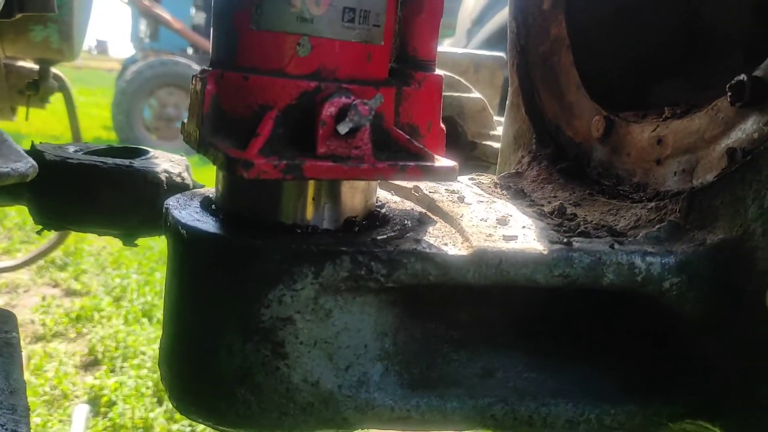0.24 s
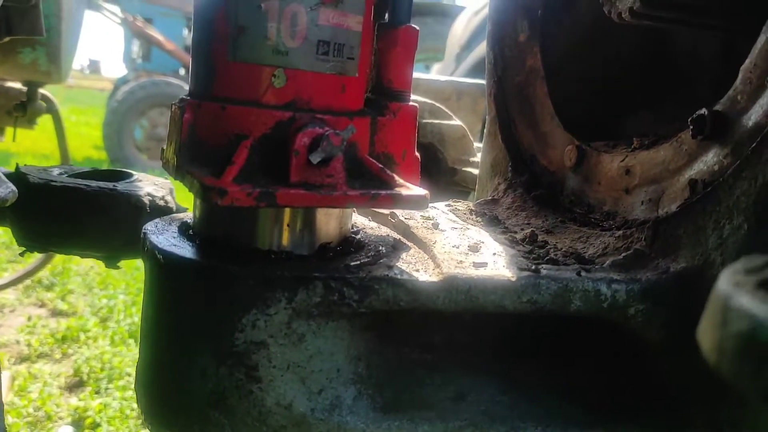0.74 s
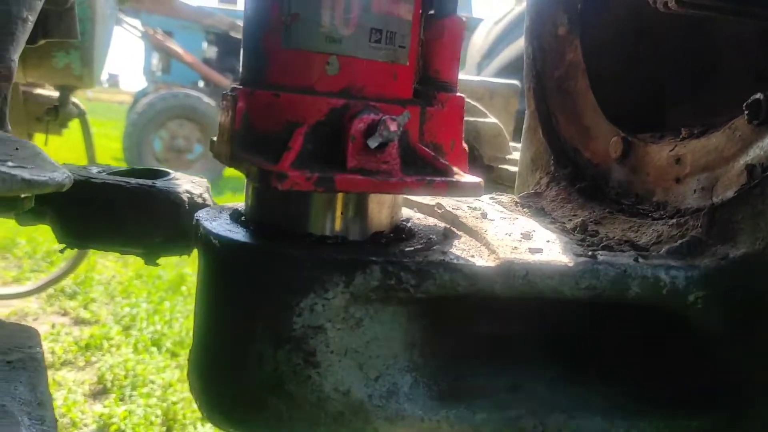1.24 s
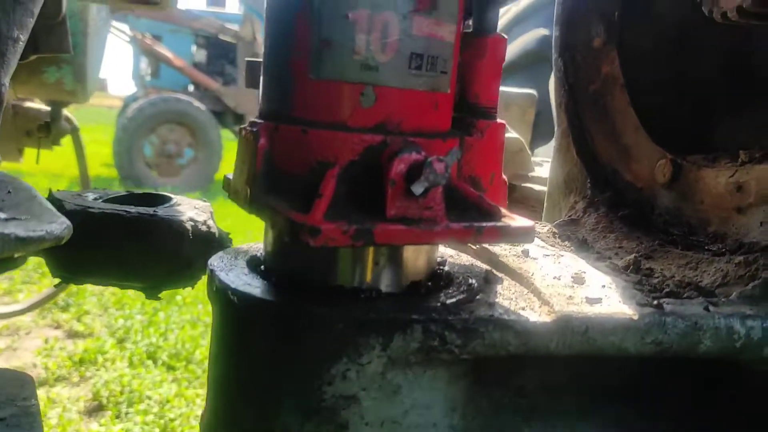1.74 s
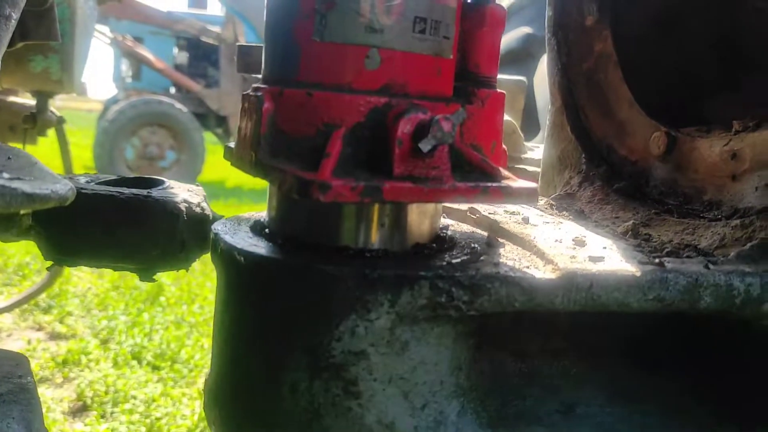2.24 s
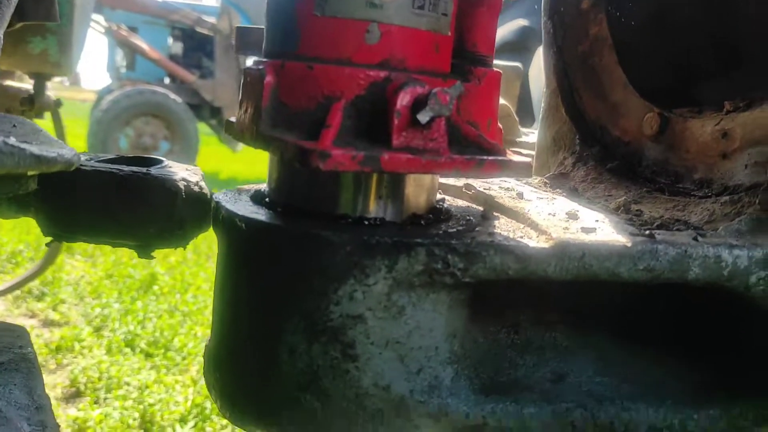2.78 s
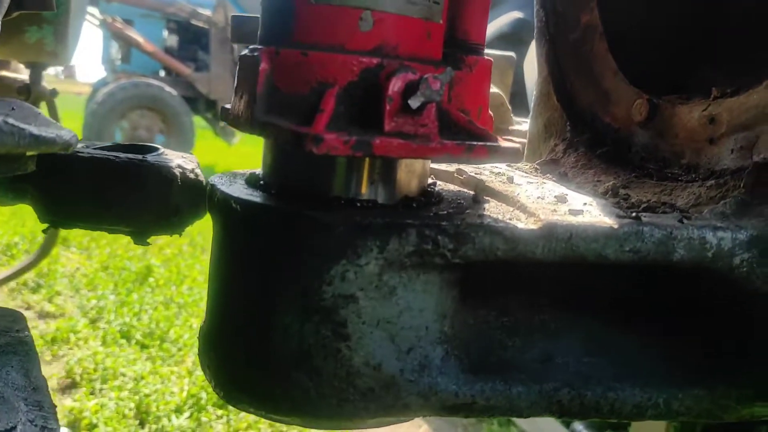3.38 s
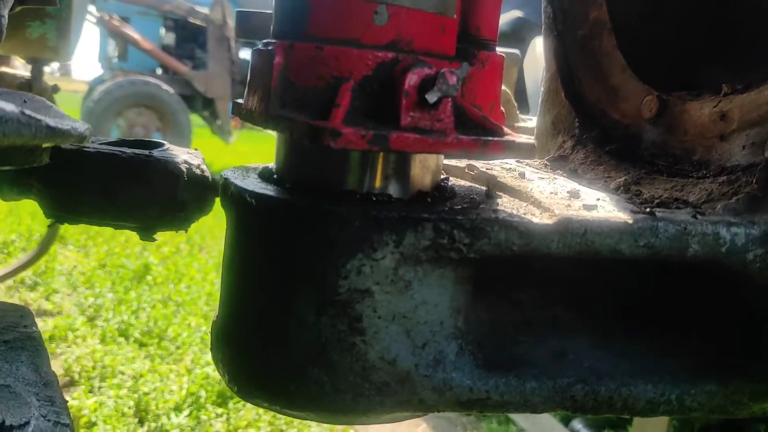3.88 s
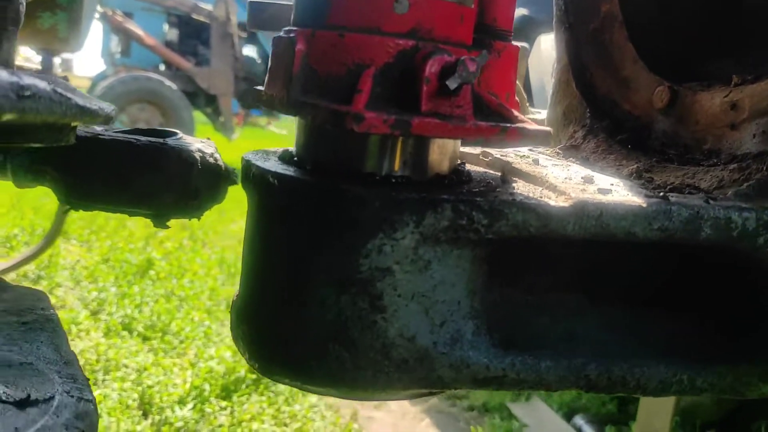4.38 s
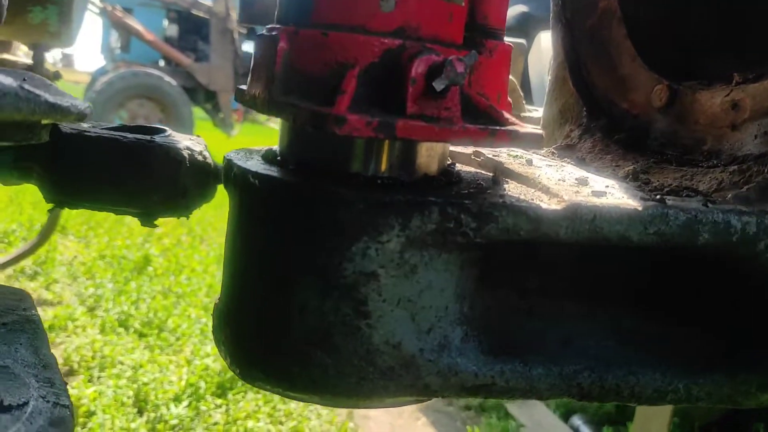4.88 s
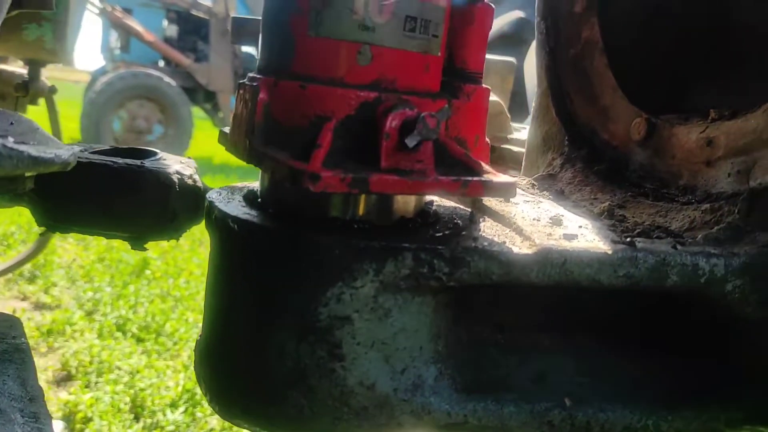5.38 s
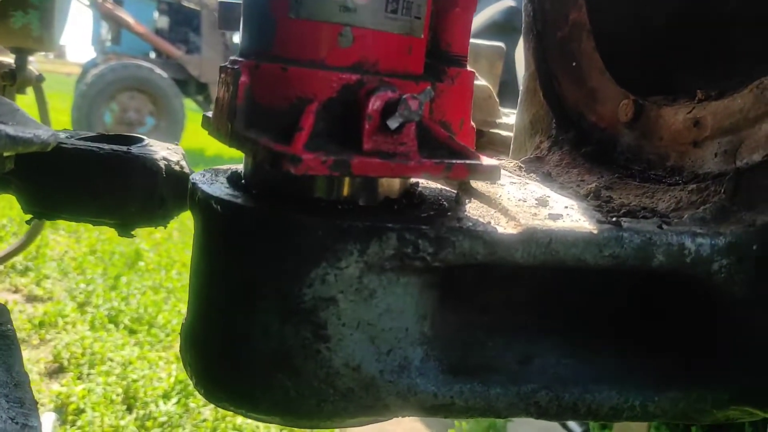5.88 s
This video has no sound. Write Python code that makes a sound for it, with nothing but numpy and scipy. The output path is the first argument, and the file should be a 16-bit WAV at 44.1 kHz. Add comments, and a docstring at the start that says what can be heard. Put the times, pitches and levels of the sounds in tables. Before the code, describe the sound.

Nine heavy metallic pump strokes clunk in triplets, a loose handle clicking and rasping between them, while a struck steel bar rings out twice over quiet open air.

```python
"""Knocks in threes through a heavy steel frame, with clicks, rasps and two ringing blows, over an outdoor hush.
A bottle jack is pumped by hand: each knock is a noise thud and crack, low frame modes and short bright rings.
The loose handle clicks (resonated noise bursts) and rasps into its socket (noise with a falling band).
A struck steel bar rings in damped modes; gain control ducks lasting loudness.
Shaped noise makes the hush, a low rumble and swells of wind and handling."""
import sys
import numpy as np
from scipy import signal
from scipy.fft import rfft, irfft
from scipy.io import wavfile
from scipy.ndimage import uniform_filter1d

SR = 44100
rng = np.random.default_rng(int(sys.argv[2]) if len(sys.argv) > 2 else 0)


def dump_mix(stems):
    """Bounce the given channels to the path in sys.argv[1] as a 16-bit WAV at rate SR."""
    frames = np.atleast_2d(stems).T  # one column per channel
    limited = np.clip(frames, -1, 1)  # hard clip at full scale
    pcm = np.round(limited * 32767).astype(np.int16)
    wavfile.write(sys.argv[1], SR, pcm)


N = 269892
PORT_LAG_S = 0.0001  # the left port hears the jack later
BENDING_ROOT_S = .27  # in steel the low bending waves arrive later than the high ones

# pump strokes, three knocks each: t/s, first knock level/dB, later knocks level/dB,
# gap to second/s, gap from second to third/s
STROKES = [(0.1331, -17.5, -24, 0.068, .0382), (0.9028, -19, -25.5, .1208, 0.047),
           (1.7942, -18.5, -25, 0.13, 0.048), (2.615, -17, -22.5, 0.083, 0.056),
           (3.2876, -22, -22.5, 0.058, .0438), (3.9366, -18, -19.5, 0.061, 0.037),
           (4.556, -19.5, -20, .0448, .0367), (5.123, -16.5, -20.5, 0.062, 0.04),
           (5.7024, -15, -20, 0.065, 0.05)]
# handle seating in its socket, a click then a rasp: t/s, click level/dB, rasp level/dB
SEATS = [(0.7506, -17, -29), (1.5996, -14, -27), (2.4624, -30, -30), (3.2153, -20.5, -27),
         (3.8885, -19, -26.5), (4.4966, -18.5, -26), (5.0835, -11.5, -27), (5.6564, -19.5, -26.5)]
# relative spectrum of a hard steel contact: f/Hz, level/dB, left-right/dB
CRACK_COLOUR = [(300, -5, 1), (750, 1, -12.5), (1550, -7.5, 3), (2430, -3.5, -9), (3020, -10, 19),
                (3080, -1, -20.5), (3580, -6.5, 11.5), (4120, -10, -4), (5370, -5, -9.5), (6360, -10, -18),
                (7420, -9, -20.5), (8640, -11.5, 12), (9500, -18, -1.5), (11450, -64.5, -13.5),
                (15700, -94, -26)]


def amp(db):
    """Amplitude ratio of a level in dB."""
    return 10 ** (np.asarray(db) / 20)


def unit(x):
    """Scale to unit RMS."""
    return x / np.sqrt(np.mean(x ** 2) + 1e-20)


def read(points, hz, axis=1):
    """One column of a spectrum, joined on a log-frequency axis."""
    points = np.array(points)
    return np.interp(np.log(hz + 1), np.log(points[:, 0] + 1), points[:, axis])


def add(mix, start_s, sound):
    """Mix a two-port sound in at start_s, cut at the end of the mix."""
    start = max(round(start_s * SR), 0)
    part = mix[:, start:][:, :sound.shape[1]]
    part += sound[:, :part.shape[1]]


def noise(size, likeness):
    """White noise at two ports, partly shared."""
    shared = np.clip(likeness, 0, 1)
    common = np.sqrt(shared) * rng.standard_normal(size)
    return common + np.sqrt(1 - shared) * rng.standard_normal((2, size))


def shaped_noise(table, likeness):
    """Unit-RMS noise with a tabled spectrum."""
    hz = np.fft.rfftfreq(N, 1 / SR)
    return unit(irfft(rfft(noise(N, likeness)) * amp(read(table, hz)), N))


def colour(x, table, size=2048):
    """Causal unit-power filter from the jack to each port; the left port hears it later."""
    hz = abs(np.fft.fftfreq(size, 1 / SR))
    pan_db = np.outer([.5, -.5], read(table, hz, axis=2))
    gain = unit(amp(read(table, hz) + pan_db))
    # minimum phase from the log gain
    taps = np.fft.ifft(np.exp(np.conj(signal.hilbert(np.log(gain))))).real
    late = np.exp(-2j * np.pi * np.outer([PORT_LAG_S, 0], np.fft.rfftfreq(size, 1 / SR)))
    lagged_taps = irfft(rfft(taps) * late)[:, :size // 2]
    return signal.oaconvolve(x, lagged_taps, axes=1)[:, :N]


def burst(rise_s, t60_s, tail_db, tail_t60_s, likeness):
    """Noise for a contact's dense modes: quick rise, fast fall, faint diffuse tail off the machine."""
    t = np.arange(SR // 3) / SR
    direct = amp(-60 * t / t60_s) * noise(len(t), likeness)
    tail = amp(tail_db - 60 * t / tail_t60_s) * noise(len(t), likeness / 2)
    return (1 - np.exp(-(t / rise_s) ** 2)) * (direct + tail)


def ring(modes, rise_s, lag_s, scatter_db, length=1, bending_root_s=0):
    """Damped modes, one row each, with scattered levels; bending sets phase by root frequency."""
    t = np.maximum(np.arange(SR * 3 // 2) / SR - np.array([[lag_s], [0]]), 0)
    rows = []
    for hz, db, t60_s, pan_db in modes:
        port_db = db + pan_db * np.array([[.5], [-.5]])
        level = amp(port_db + scatter_db * rng.standard_normal())
        decay = np.exp(-np.log(1000) * t / (t60_s * length))
        rows.append(level * decay * np.sin(2 * np.pi * (hz * t - bending_root_s * np.sqrt(hz))))
    return np.array(rows) * (1 - np.exp(-t / rise_s))


def swell_level():
    """A few Gaussian swells of wind and handling, made uneven by random lumps."""
    # t/s, level before lumps/dB, half length/s
    swells = [(.3, -44, .12), (1.3, -52, 0.31), (2.1, -50, 0.043), (2.797, -51, 0.18), (4.24, -41.5, 0.2),
              (5.155, -54, 0.12), (5.84, -42, 0.26)]
    lumps_per_s, lump_db = 26, 5
    t = np.arange(N) / SR
    lumps = np.interp(t * lumps_per_s, np.arange(1000), rng.standard_normal(size=1000))
    envelope = sum(amp(db) * np.exp(-((t - s) / half_s) ** 2) for s, db, half_s in swells)
    return amp(lump_db * lumps) * envelope


def air():
    """Shaped noise: steady outdoor hush with a high hiss, steady rumble, and lumpy low swells."""
    # relative spectra: f/Hz, level per Hz/dB
    hush_colour = [(25, -4.5), (250, -2), (400, -7.5), (650, -13.5), (950, -10.5), (1300, -18.5),
                   (2000, -21), (2850, -20.5), (3100, -18), (3400, -22), (4200, -22), (7100, -11),
                   (9100, -19.5), (9700, -39), (15000, -46), (16500, -67.5)]
    rumble_colour = [(10, -8), (28, 4.5), (75, -8.5), (200, -9.5), (600, -27.5), (3000, -81)]
    swell_colour = [(10, -13), (30, -1), (70, 0), (110, -12.5), (200, -1), (300, -8), (600, -26.5),
                    (3000, -79)]
    hush_db, rumble_db = -48, -55
    hush = shaped_noise(hush_colour, likeness=0.22)
    rumble = shaped_noise(rumble_colour, likeness=0.15)
    swell = shaped_noise(swell_colour, likeness=0.27)
    return amp(hush_db) * hush + amp(rumble_db) * rumble + swell_level() * swell


def knock_rows():
    """Every knock as t/s, level/dB; a stroke that hangs slips softly before its second knock."""
    slow_gap_s, slip_lead_s, slip_db = .1, .04, -6
    for s, first_db, later_db, gap_s, next_gap_s in STROKES:
        yield s, first_db
        if gap_s > slow_gap_s:
            yield s + gap_s - slip_lead_s, later_db + slip_db
        yield s + gap_s, later_db
        yield s + gap_s + next_gap_s, later_db


def knocks():
    """Each knock cracks with short bright rings and rings the frame afresh, choking its old ring."""
    # low modes of the frame: f/Hz, level/dB, t60/s, left-right/dB
    frame_modes = [(142.3, -18.5, 0.62, 11), (183.3, -16, 0.79, 7.5), (226.5, -13, 0.5, 6),
                   (251, -14, 0.46, 6), (306.3, 4, 0.2, 8.5), (343, -13.5, 0.064, 16.5),
                   (480, -3, 0.089, 20), (497, -23, 0.16, 2), (538, -3, 0.19, -6.5),
                   (555.5, -15.5, 0.32, 12.5), (609.5, -0.5, 0.13, 0), (636, -26, 0.045, -6),
                   (697, -4.5, .14, 15), (695, -22, 0.064, 0), (759, -15, 0.28, -11.5),
                   (794, -8, 0.25, -4.5), (806, -17.5, 0.14, 21), (962, -16, 0.27, 16.5),
                   (1010, -25, 0.77, -14), (1082, -7.5, 0.75, 6.5), (1257, -26.5, 0.27, 22),
                   (1340, -20, 0.23, 8.5), (1550, -13, 0.1, 4.5)]
    # short bright rings of the crack, some from the microphone: f/Hz, level/dB, t60/s, left-right/dB
    crack_modes = [(1598, -14, 0.074, -3.5), (2005, -30, 0.12, 15.5), (2374, -8.5, 0.027, 3),
                   (2510, -15, 0.077, 5.5), (2790, -17.5, 0.082, -1), (3076, -9.5, 0.033, -15),
                   (5427, -4.5, 0.03, -10), (7070, 2.5, 0.013, -5), (8350, -3, 0.016, 0.5)]
    # relative thud spectrum: f/Hz, level/dB, left-right/dB
    thud_colour = [(61.5, -54, -14), (148, -4.5, 1), (332, 3.5, 6), (440, -2, 6), (556, -5.5, 8),
                   (914, -2.5, 9), (1080, -12, -1), (1630, -16.5, -0.5), (2880, -25, 3), (6030, -58, 2)]
    # the crack grows faster than the thud with force, and hardens as the load builds
    usual_knock_db, crack_offset_db, crack_per_db, crack_db_per_s = -21.5, -3.5, 0.68, 0.84
    choke_s = 0.0079  # decay time constant
    frame, bright, thud, crack = np.zeros((4, 2, N))
    frame_rings = [ring(frame_modes, rise_s=.0022, lag_s=.0003, scatter_db=1,
                        bending_root_s=BENDING_ROOT_S).sum(0) for _ in range(3)]
    bright_rings = [ring(crack_modes, rise_s=0.0014, lag_s=PORT_LAG_S, scatter_db=3.5).sum(0)
                    for _ in range(5)]
    choke = np.exp(-np.minimum(np.arange(N) / SR / choke_s, 20))
    for s, thud_db in knock_rows():
        force_db = crack_per_db * (thud_db - usual_knock_db)
        crack_db = thud_db + crack_offset_db + force_db + crack_db_per_s * s
        start = round(s * SR)
        frame[:, start:] *= choke[:N - start]
        add(frame, s, amp(thud_db) * frame_rings[rng.integers(len(frame_rings))])
        add(bright, s, amp(crack_db) * bright_rings[rng.integers(len(bright_rings))])
        thud_hit = burst(rise_s=0.0031, t60_s=0.16, tail_db=-9.5, tail_t60_s=0.51, likeness=0.83)
        crack_hit = burst(rise_s=0.0017, t60_s=0.039, tail_db=-17.5, tail_t60_s=0.12, likeness=0.9)
        add(thud, s, amp(thud_db) * thud_hit)
        add(crack, s, amp(crack_db) * crack_hit)
    rings = amp(-3) * frame + amp(0.5) * bright
    return rings + colour(amp(-3) * thud, thud_colour) + colour(amp(3.5) * crack, CRACK_COLOUR)


def click_rows():
    """Every contact of the handle, lifted, seated or chattering: t/s, tick level/dB, clack level/dB."""
    # clicks of the loose handle as it is lifted: t/s, level/dB
    lifts = [(0.364, -30.5), (0.4464, -32), (0.477, -21), (0.489, -20.5), (1.1642, -31.5), (1.279, -29.5),
             (1.3018, -15), (2.0712, -30.5), (2.191, -27), (2.1988, -16), (2.2107, -25), (2.9382, -19.5),
             (2.9518, -14.5), (3.1837, -28.5), (3.6141, -17.5), (3.6273, -22.5), (3.8691, -38),
             (4.2292, -19), (4.4727, -14.5), (4.7136, -26.5), (4.7316, -13), (4.7593, -25.5),
             (4.797, -14.5), (4.8309, -30), (5.2998, -24.5), (5.3211, -17.5), (5.3319, -17.5),
             (5.4077, -25.5), (5.892, -30), (5.911, -26.5), (5.971, -29.5), (5.989, -26.5), (6.0162, -28)]
    touch_lead_s, touch_db = .008, -26  # the handle touches just before it seats
    seat_clack_db = -11  # relative to the tick
    clack_offset_db, clack_per_db = -24.5, 0.8
    # faint chatter of the linkage around each seating
    chatter_count, chatter_db, chatter_spread_db = 2, -34.5, 7.5
    chatter_before_s, chatter_after_s = .045, 0.015
    # faint ticks of the linkage at chance moments while the handle comes back up
    stray_db, return_start_s, return_length_s = -36.5, .25, .3
    seated, loose = [], list(lifts)
    for s, db, _ in SEATS:
        seated += [(s - touch_lead_s, touch_db), (s, db)]
        for when, size in rng.random((chatter_count, 2)):
            chatter_s = s - chatter_before_s + when * (chatter_before_s + chatter_after_s)
            loose.append((chatter_s, chatter_db + chatter_spread_db * (2 * size - 1)))
    for s, *_ in STROKES:
        loose.append((s + return_start_s + return_length_s * rng.random(), stray_db))
    seated_rows = [(s, db, db + seat_clack_db) for s, db in seated]
    return seated_rows + [(s, db, clack_offset_db + clack_per_db * db) for s, db in loose]


def clicks():
    """Steel ticks on steel after a brief scrape; each contact favours a few rings of its own."""
    # relative spectra: f/Hz, level/dB, left-right/dB
    tick_colour = [(200, -13, 6), (1230, -8, 5.5), (3070, 0, -5), (3600, 0.5, -1.5), (5160, 1.5, -10.5),
                   (5660, -1, -17.5), (7770, 9.5, -8.5), (9170, 0, 2), (9050, 0, 16), (10520, -16.5, -5.5),
                   (10780, -10, -17), (11850, -20, 13), (15100, -20, -8.5), (17200, -28, -9.5)]
    clack_colour = [(300, -11, 1), (1300, -4.5, 14.5), (2460, 5.5, -2), (3110, 7, -4), (4230, -17.5, 19.5),
                    (9000, -49, 25)]
    sing_hz, sing_spread_hz = 7520, 530  # the brightest ring of a contact
    tick, clack = np.zeros((2, 2, N))
    for s, db, clack_db in click_rows():
        hz = sing_hz + sing_spread_hz * rng.standard_normal()
        hit = burst(rise_s=0.00047, t60_s=.025, tail_db=-22, tail_t60_s=0.13, likeness=0.59)
        sing = signal.lfilter(*signal.iirpeak(min(hz, SR / 3), 22, SR), hit)
        overtones = sum(signal.lfilter(*signal.iirpeak(f, 90, SR), hit)
                        for f in rng.uniform(2500, 9500, 5))
        add(tick, s, amp(db) * (hit + amp(-0.5) * sing + amp(6) * overtones))
        add(tick, s + rng.uniform(0.0098, .018), amp(db - 16.5) * hit)  # faint rebound
        clack_hit = burst(rise_s=0.0022, t60_s=0.048, tail_db=-15.5, tail_t60_s=0.14, likeness=0.59)
        add(clack, s, amp(clack_db) * clack_hit)
        scrape = noise(SR // 100, .5) * np.linspace(0, 1, SR // 100) ** 2
        add(tick, s - len(scrape[0]) / SR, amp(db - 19) * scrape)
    return colour(amp(2.5) * tick, tick_colour) + colour(amp(7) * clack, clack_colour)


def slides():
    """Hollow rasp as the handle seats; its pitch falls as the slower waves come down the tube."""
    # relative rasp spectrum: f/Hz, level/dB, left-right/dB
    rasp_colour = [(120, -21, 4), (353, -1.5, 2), (670, -3, -1.5), (987, 12.5, 4.5), (1150, -3, -0.5),
                   (2400, -17.5, 8), (5000, -29, -28), (11900, -55, -6)]
    rasp_delay_s = .0125
    rasp, sweep = np.zeros((2, 2, N))
    for click_s, _, db in SEATS:
        s = click_s + rasp_delay_s
        rub = burst(rise_s=0.0042, t60_s=0.1, tail_db=-16.0, tail_t60_s=0.24, likeness=0.63)
        t = np.arange(rub.shape[1]) / SR
        pitch_hz = 850 + 2000 * np.exp(-t / .013)
        carrier = np.cos(2 * np.pi * np.cumsum(pitch_hz) / SR)
        band = signal.lfilter(*signal.butter(2, 380, fs=SR), rub) * carrier
        add(rasp, s - .008, amp(db) * rub)
        add(sweep, s - .011, amp(db) * band)
    return colour(amp(4.0) * rasp, rasp_colour) + amp(16.5) * sweep


def bar():
    """Hard clash and rebound, then the two lowest bending modes sing on; seatings hum them faintly."""
    # blows: t/s, level/dB, extra level on lowest mode/dB, factor on ring time
    blows = [(2.7772, -3, -11.5, 1.07), (4.073, -4, 0, 1.037)]
    # modes: f/Hz, level/dB, t60 before that factor/s, left-right/dB
    bar_modes = [(1083.8, -2, 0.88, 0.5), (2018.5, -7.5, 0.38, 9), (2510, -22, 0.087, 23),
                 (2590, -14, 0.078, 0), (2830, -14.5, 0.094, -5), (3020, -4, 0.053, -5),
                 (3450, -15, 0.097, -11), (3710, -11, 0.05, -7.5), (4960, -23, 0.067, -5),
                 (5360, -25, 0.054, 8), (6940, -12, 0.038, 15), (8360, -12.5, 0.045, 14),
                 (9800, -30, 0.073, -3)]
    # relative clash spectrum: f/Hz, level/dB, left-right/dB
    clash_colour = [(300, -6, 0), (760, 6, -4), (1500, 6, -3), (2630, 0, -16), (4060, -3.5, 1),
                    (4930, 8.5, 7), (7240, -3, 1), (9000, 2, -1), (10300, -12, 3), (15400, -17, 3),
                    (16500, -25, -3)]
    rebound_s = .005
    hum_db = -17.5  # relative to the seating's rasp
    tone, clash, rebound = np.zeros((3, 2, N))
    for s, db, lowest_db, length in blows:
        modes = ring(bar_modes, rise_s=.0006, lag_s=PORT_LAG_S, scatter_db=0, length=length,
                     bending_root_s=BENDING_ROOT_S / 2)
        add(tone, s, amp(db) * (amp(lowest_db) * modes[0] + modes[1:].sum(0)))
        clash_hit = burst(rise_s=0.00073, t60_s=0.04, tail_db=-22, tail_t60_s=0.084, likeness=0.27)
        rebound_hit = burst(rise_s=0.0016, t60_s=0.061, tail_db=-8.5, tail_t60_s=.12, likeness=1.0)
        add(clash, s, amp(db) * clash_hit)
        add(rebound, s + rebound_s, amp(db) * rebound_hit)
    hum = ring(bar_modes[:2], rise_s=.004, lag_s=PORT_LAG_S, scatter_db=6.5).sum(0)
    for s, _, rasp_db in SEATS:
        add(tone, s, amp(rasp_db + hum_db) * hum)
    return tone + colour(amp(-0.5) * clash, clash_colour) + colour(amp(-4) * rebound, CRACK_COLOUR)


def scene():
    """Sum of all sources at the two ports."""
    return air() + knocks() + clicks() + slides() + bar()


def record(dry):
    """Gain control falls on lasting loudness and creeps back; then clipping and a low-pass."""
    threshold_db, recovery_db_per_s, edge_hz = -15, 80, 16300
    # 34 ms mean power, mostly of the past, so short knocks weigh little
    power = uniform_filter1d((dry ** 2).mean(0), size=1500, origin=550)
    power_db = 10 * np.log10(abs(power) + 1e-12)
    recovery_db = np.arange(N) * recovery_db_per_s / SR
    held_db = np.maximum.accumulate(power_db + recovery_db) - recovery_db
    over_db = np.maximum(held_db - threshold_db, 0)
    ducked = dry * amp(-uniform_filter1d(over_db, size=100))
    limited = np.clip(ducked, -.95, .95)
    low_pass = signal.firwin(255, edge_hz, window=("kaiser", 8), fs=SR)
    return signal.oaconvolve(limited, low_pass[None], "same")


dry = scene()
out = record(dry)
dump_mix(out)
```